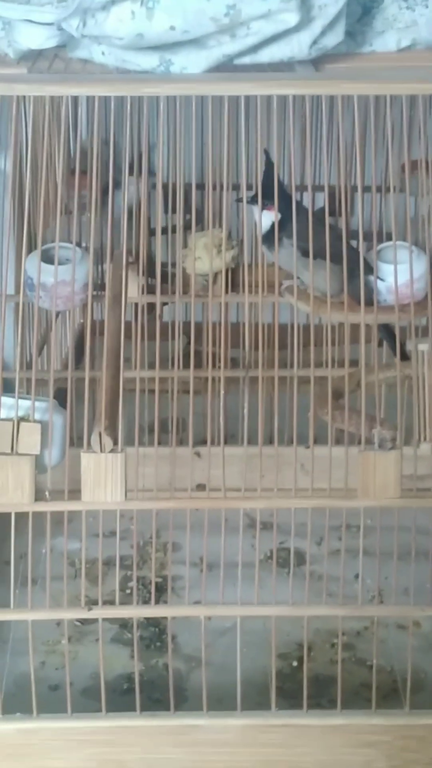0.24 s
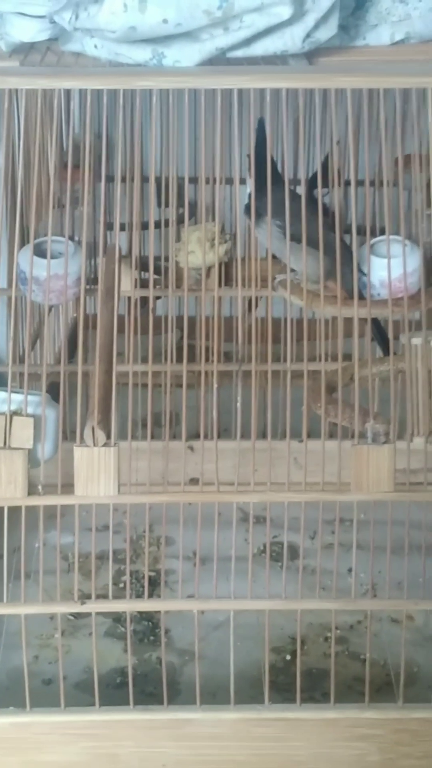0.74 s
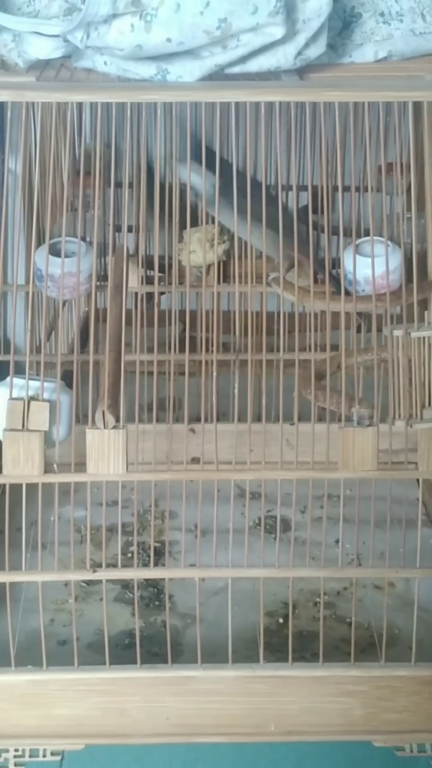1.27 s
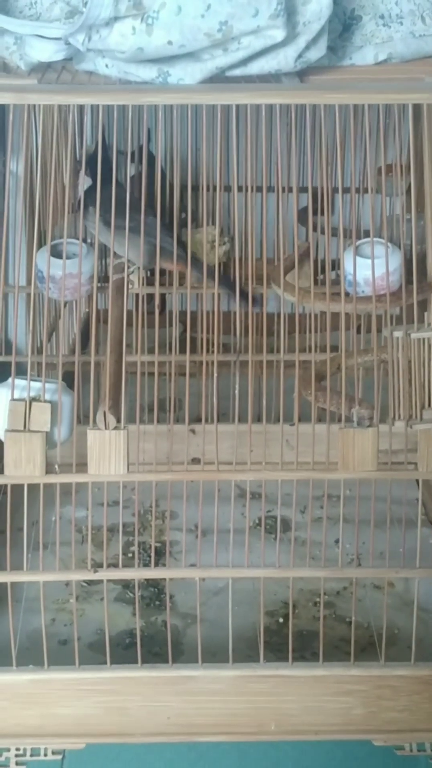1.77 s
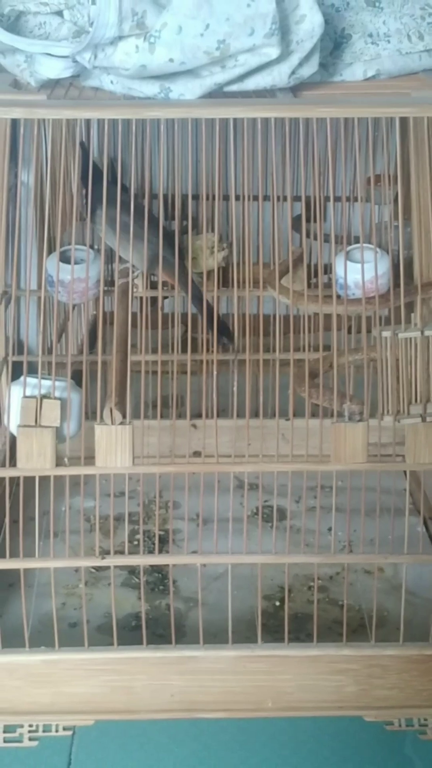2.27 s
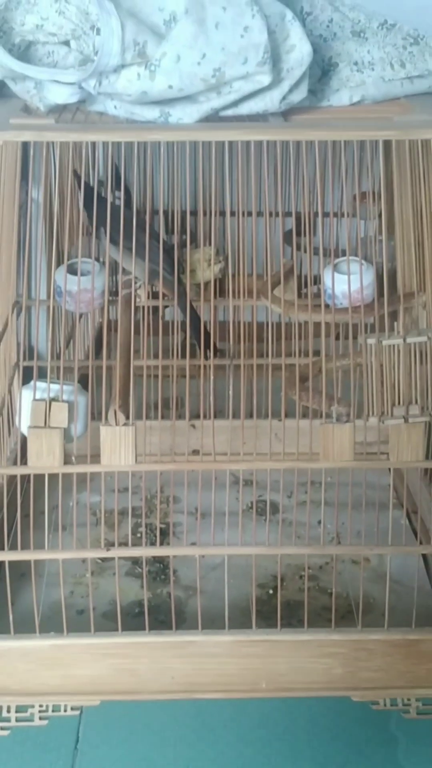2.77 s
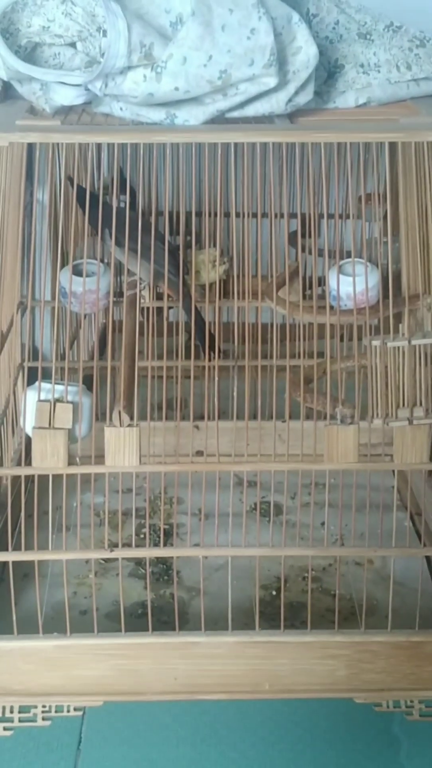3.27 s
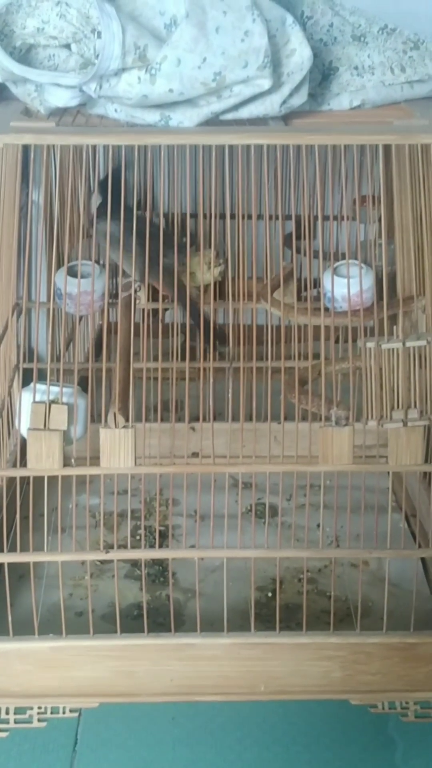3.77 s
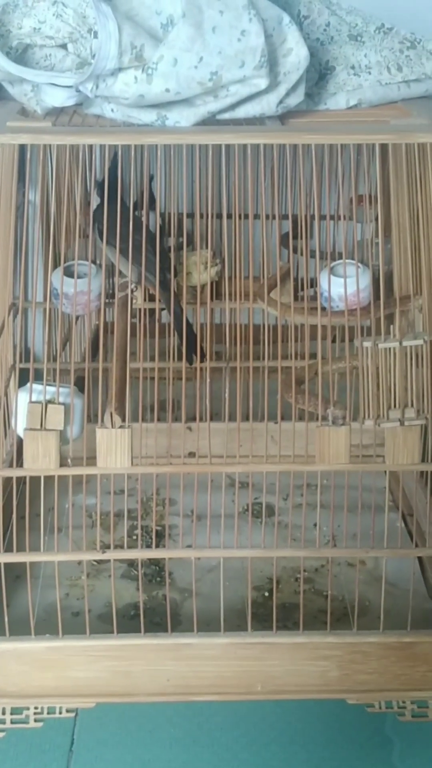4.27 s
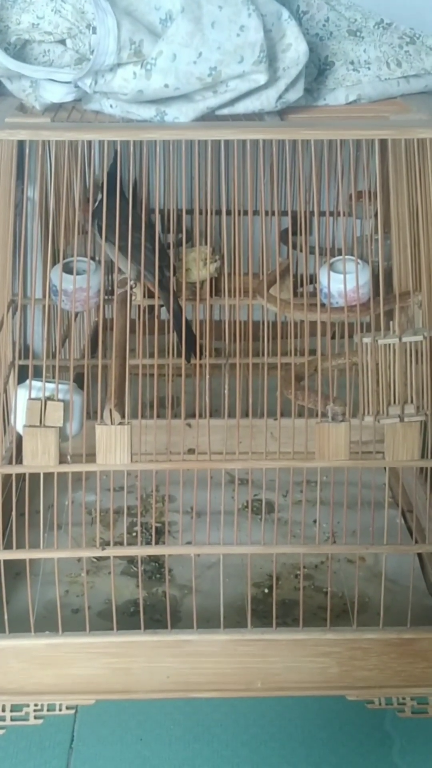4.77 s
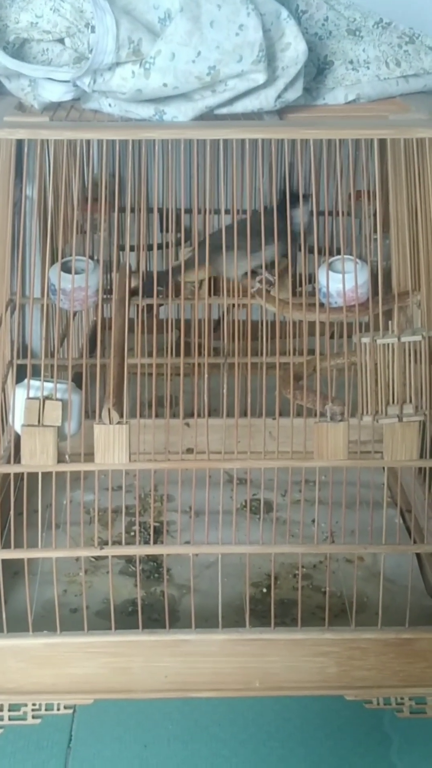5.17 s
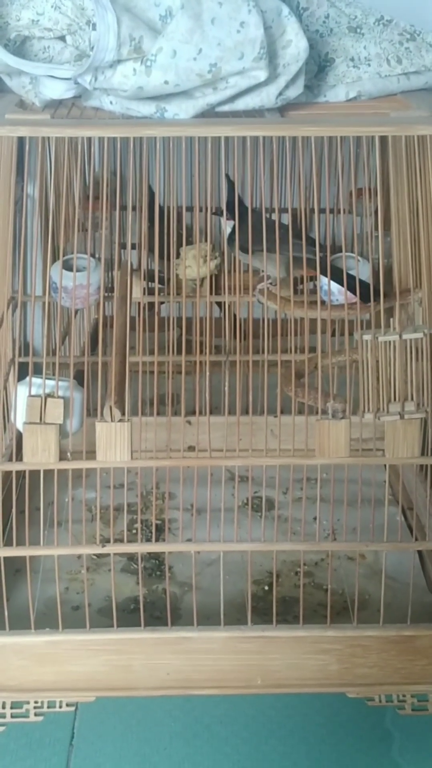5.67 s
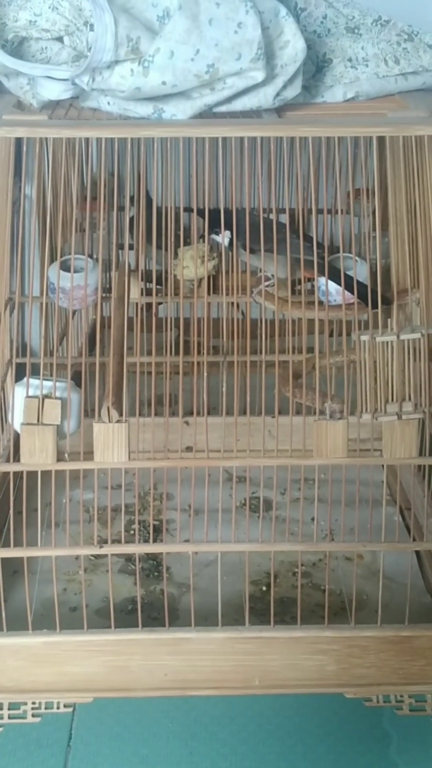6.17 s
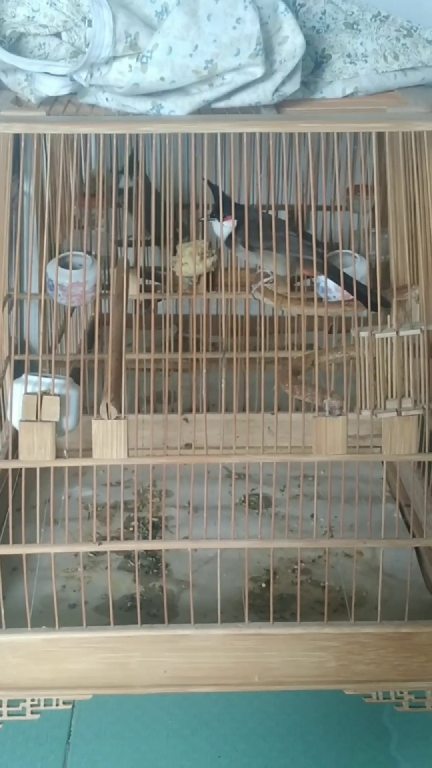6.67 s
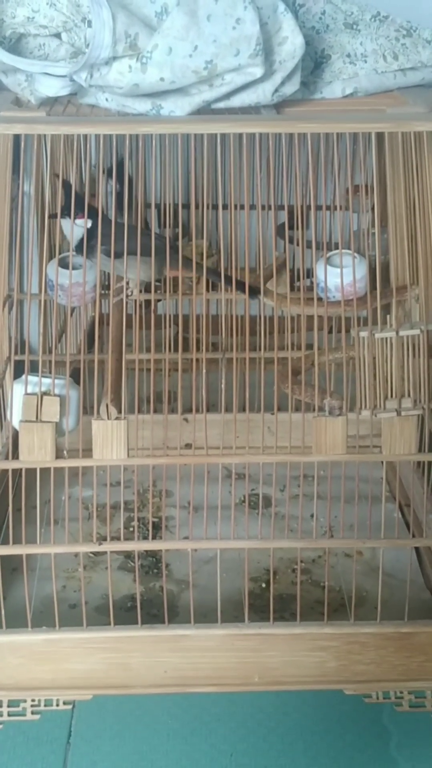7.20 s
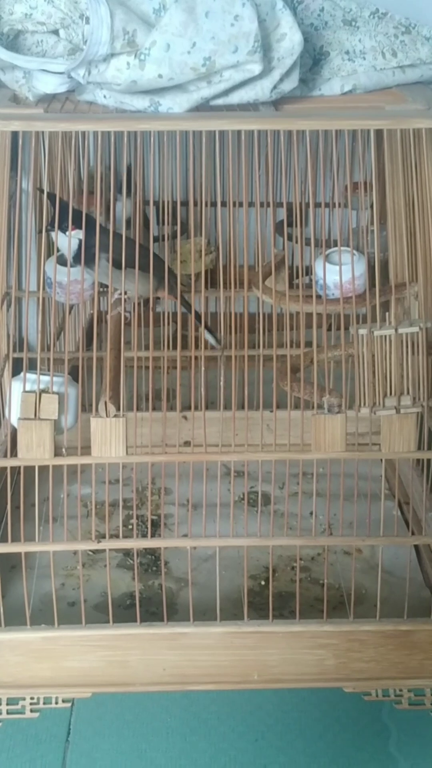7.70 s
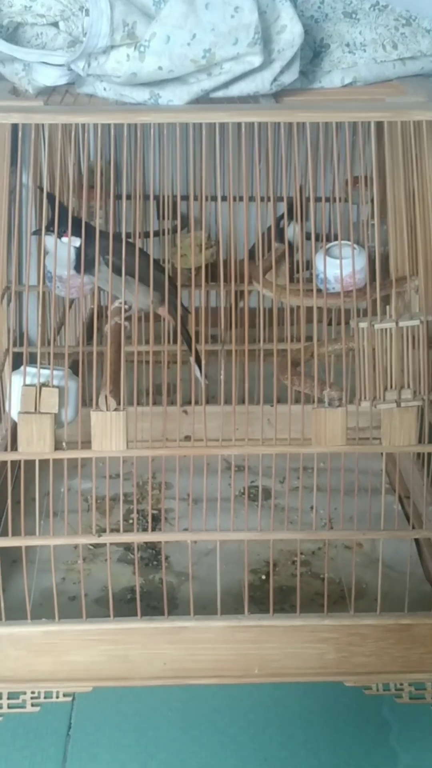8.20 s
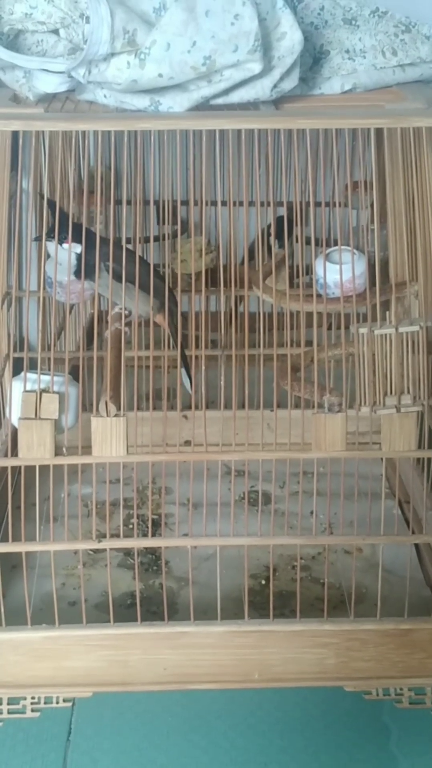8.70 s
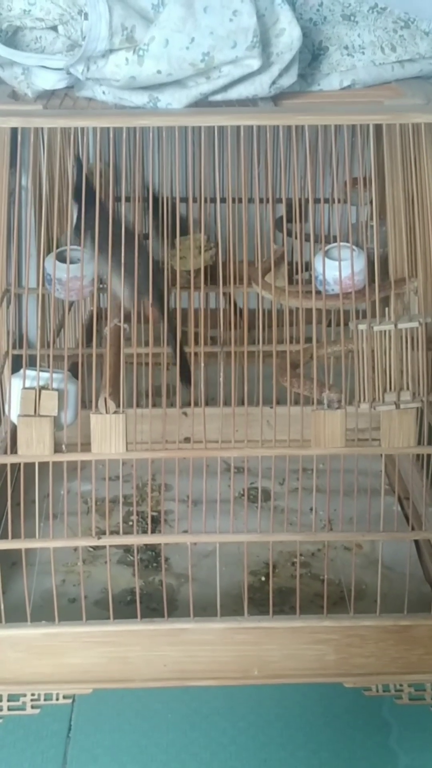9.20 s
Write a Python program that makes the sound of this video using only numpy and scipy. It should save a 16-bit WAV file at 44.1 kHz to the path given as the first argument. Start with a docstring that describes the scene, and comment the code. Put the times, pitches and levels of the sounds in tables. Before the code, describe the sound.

Bright, warbling bulbul calls burst out three times in a reverberant room, amid softer chirps, low chucks, perch scuffs and faint hiss.

```python
"""Caged bulbuls sing in a bare, echoing room, from a repertoire of seven whistled, warbling syllables.
Each note is a tone whose pitch and strength a fast warble shakes, with overtones and a breathy rasp.
The main phrase is a rising whip answered by an arch; other syllables are strung into chatter around it.
Room noise, a faint rumble and a wavering hiss, lies underneath.
Feet and feathers tick and scuff on the perches and bamboo bars: short grainy noise, some with a knock."""
import sys
import numpy as np
from scipy import signal
from scipy.fft import rfft, irfft, next_fast_len
from scipy.io import wavfile
from scipy.ndimage import map_coordinates

SR = 44100
rng = np.random.default_rng(int(sys.argv[2]) if len(sys.argv) > 2 else 0)


def waveform_to_disk(signal):
    """Save audio, clipped to [-1, 1], as 16-bit WAV at the path in sys.argv[1]."""
    frames = np.transpose(np.atleast_2d(signal))
    scaled = np.clip(frames, -1, 1) * 32767
    samples = np.round(scaled).astype(np.int16)
    wavfile.write(sys.argv[1], SR, samples)


N = 416744

# Syllable shapes at evenly spaced moments: pitch_ratio and warble_ratio (times the note's own), level_db
# whips up and levels off
WHIP_SHAPE = [(.7, 1.21, -6.5), (.91, 0.9, -2.5), (1, 0.79, 0), (1.02, 0.49, 2)]
# climbs, buzzes at the top, falls: pitch_ratio, warble_ratio, level_db
ARCH_SHAPE = [(0.63, 1.33, -4.5), (0.788, 0.83, -1.5), (0.87, 0.71, 0), (0.974, 0.95, -2.5),
              (1.028, 0.5, -0.5), (1.13, 1.46, -6), (1.008, 0.76, -2.0), (0.942, 0.48, 2.5),
              (0.84, 1.06, 7)]
# nearly level and deeply warbled: pitch_ratio, warble_ratio, level_db
BUZZ_SHAPE = [(1.03, 1.4, 2.5), (0.97, 0.85, -1.5), (1.006, 0.7, -0.5)]
# slides down: pitch_ratio, warble_ratio, level_db
SLUR_SHAPE = [(1.09, 0.87, 0), (1, 0.92, 0), (.92, 0.9, 0)]
# a clear, nearly level tone: pitch_ratio, warble_ratio, level_db
PIPE_SHAPE = [(1, .9, -1), (.995, 0.65, 0), (1.012, .8, 2)]
# a low, throaty hook: pitch_ratio, warble_ratio, level_db
CHUCK_SHAPE = [(.9, 1, -1), (1.02, .9, 0), (.97, 1, 0)]
# leaps up about an octave and holds the note: pitch_ratio, warble_ratio, level_db
SWOOP_SHAPE = [(0.45, 0.96, -8.5), (0.79, 1.0, -10), (1.024, 0.7, -4.5), (1.0, 0.71, 3),
               (0.997, 0.95, -0.5)]

# The main phrase, a whip answered by an arch: start_s, whip_hz, whip_db, arch_hz, arch_db
PHRASES = [(0.543, 3714, -30.5, 2950, -32), (2.435, 3456, -14.5, 2930, -11.5),
           (7.313, 3655, -15.5, 3060, -12.0)]
WHIP_S, ARCH_AFTER_S, ARCH_S = 0.096, 0.158, 0.168  # the arch is timed from the start of the whip
PHRASE_WARBLE = 0.1  # share of the pitch, before the shape scales it

# Chatter, by syllable: start_s, length_s, pitch_hz, level_db, warble_share (of the pitch, before the shape)
# rising whips
WHIP_NOTES = [(1.169, 0.088, 3434, -29.5, 0.16), (1.542, 0.068, 3438, -26.0, 0.045),
              (3.139, 0.08, 3393, -33.5, 0.15), (3.279, 0.15, 3625, -32, 0.116),
              (4.617, 0.088, 3620, -38.5, 0.083), (4.726, 0.18, 3620, -34.5, 0.098),
              (6.287, 0.114, 2470, -29.5, 0.13), (8.126, 0.047, 3387, -22.5, 0.14),
              (9.278, 0.097, 3350, -19.5, 0.11)]
# octave leaps: start_s, length_s, pitch_hz, level_db, warble_share
SWOOP_NOTES = [(1.395, 0.093, 2470, -26, 0.055), (5.175, 0.053, 2998, -16, 0.022)]
# deeply warbled notes: start_s, length_s, pitch_hz, level_db, warble_share
BUZZ_NOTES = [(-0.044, 0.045, 3005, -22.5, 0.17), (2.295, 0.049, 2657, -36, 0.15),
              (3.34, 0.072, 4000, -39.5, 0.1), (3.454, 0.17, 3033, -33.5, 0.12),
              (3.632, 0.14, 3360, -42, 0.11), (3.943, 0.051, 3285, -30.0, 0.12),
              (4.987, 0.14, 2450, -39.5, 0.16), (5.062, 0.06, 3886, -13.5, 0.12),
              (5.216, 0.079, 3638, -12, 0.074), (5.957, 0.062, 2348, -33.5, 0.1),
              (6.02, 0.139, 2424, -35.5, 0.15), (6.414, 0.078, 2594, -28.0, 0.126),
              (6.867, 0.054, 2156, -37, 0.096), (7.739, 0.044, 3820, -31.5, 0.053),
              (7.872, 0.12, 3375, -25, 0.12), (8.092, 0.0062, 3585, -20.5, 0.13),
              (8.175, 0.17, 3237, -29.5, 0.066), (8.536, 0.036, 3340, -25, 0.13)]
# falling slides: start_s, length_s, pitch_hz, level_db, warble_share
SLUR_NOTES = [(0.53, 0.043, 1777, -43, 0.19), (1.644, 0.099, 2684, -28.0, 0.087),
              (1.742, 0.13, 1861, -37.5, 0.081), (2.104, 0.128, 1640, -41, 0.067),
              (3.728, 0.097, 2043, -41.5, 0.095), (3.83, 0.11, 2570, -31, 0.078),
              (4.438, 0.172, 1910, -48, 0.14), (4.645, 0.083, 2497, -40.0, 0.062),
              (5.055, 0.014, 3585, -19.5, 0.1), (6.806, 0.103, 2603, -39, 0.083),
              (7.772, 0.176, 2340, -28, 0.11), (8.093, 0.023, 2152, -20.5, 0.048),
              (8.168, 0.032, 2504, -24.5, 0.13), (8.424, 0.11, 2540, -30.5, 0.068),
              (8.839, 0.087, 1660, -36.5, 0.12)]
# clear tones: start_s, length_s, pitch_hz, level_db, warble_share
PIPE_NOTES = [(.005, 0.054, 2870, -24.5, 0.011), (2.404, 0.075, 1996, -25.5, .05),
              (3.8, 0.049, 1640, -38.5, .025), (3.976, .035, 2835, -28.5, .015),
              (5.052, 0.06, 3167, -20.5, .02), (6.115, .033, 1940, -33.5, .03),
              (6.472, 0.0386, 1948, -29.5, 0.032), (8.553, 0.089, 2930, -25.5, 0.022),
              (9.09, 0.07, 2077, -24, .01), (9.325, .06, 3440, -27.5, 0.021)]
# throaty hooks, sharing one warble: start_s, length_s, pitch_hz, level_db
CHUCK_NOTES = [(1.415, 0.028, 1443, -44), (1.531, 0.062, 1956, -37.5), (2.3, 0.024, 1430, -33),
               (3.71, 0.042, 1520, -36.5), (3.865, 0.026, 1380, -40), (6.182, 0.097, 1494, -50),
               (6.298, 0.055, 1600, -43.5), (6.42, .061, 1498, -44), (6.658, .038, 1532, -42.5),
               (6.963, .057, 1542, -40), (7.012, 0.043, 1700, -39.5), (7.142, 0.037, 1600, -42),
               (7.636, 0.022, 1530, -36.5), (7.704, .045, 1990, -31.5), (7.896, 0.051, 1726, -31)]
CHUCK_WARBLE = 0.075  # share of the pitch, before the shape scales it
CHUCK_OCTAVE_DB = -10  # a chuck's second harmonic, against its first

# Overtones of a loud note, before they are coloured: pitch_multiple, level_db
OVERTONES = [(2, -32), (3, -35), (4, -42)]
# The colour on overtones and rasp, dipping near 5.5 kHz and peaking near 9.6 kHz: frequency_hz, gain_db
EDGE_COLOUR = [(1000, -5.5), (4500, 1.5), (5500, -8), (7000, -4), (8200, -3), (9600, 6), (11000, -2), (12500, -7),
               (15000, -19)]
# The room's decay: frequency_hz, t60_s
ROOM_DECAY = [(300, 0.49), (1500, 0.89), (3000, 0.75), (4500, 0.79), (9000, 0.58), (15000, 0.2)]

# Spectrum of the room's rumble: frequency_hz, relative level_db (per Hz)
RUMBLE = [(15, -18), (25, 3.5), (55, 0), (90, -6.5), (140, -3.5), (250, -15.5), (500, -46)]
# Spectrum of the room's hiss: frequency_hz, relative level_db (per Hz)
HISS = [(100, -21), (250, -1.5), (500, 1), (1000, -4.5), (2500, -1.5), (4500, -6.5), (6500, -15.5),
        (9200, -11), (12000, -33), (15000, -42.5)]
RUMBLE_DB, HISS_DB = -54.5, -55
# How alike the room noise is at left and right: frequency_hz, likeness (0 to 1)
ALIKE = [(30, 0.38), (120, 0.91), (300, 0.72), (600, 0.56), (1500, 0.035), (10000, 0.076)]

# Feet and feathers on the cage: start_s, scuff_db, knock_db (on the perch), length_s, bar_hz (the rubbed bar)
SCUFFS = [(2.071, -49, -49.5, 0.02, 1790), (2.295, -49, -69, 0.038, 3020), (2.885, -36.5, -46, 0.025, 2610),
          (3.45, -44.5, -60, 0.023, 4180), (3.744, -42.5, -67, 0.038, 3930), (4.29, -47, -52, 0.022, 4660),
          (5.825, -54.5, -56, 0.044, 2010), (5.996, -51.5, -55.5, 0.029, 3420),
          (6.693, -39.5, -56.5, 0.044, 8670), (7.229, -56, -70, 0.07, 4560), (7.989, -35, -58, 0.038, 4980),
          (8.767, -45.5, -61.5, 0.067, 2200)]
# Spectrum of the scrape: frequency_hz, relative level_db (per Hz)
SCRAPE = [(700, -13.5), (1500, 3.5), (3000, 10.5), (5000, 0), (7000, -4), (9500, -3.5), (12000, -21.5),
          (15000, -31)]
# Spectrum of the perch knock: frequency_hz, relative level_db (per Hz)
PERCH = [(120, -24.5), (250, -7.5), (400, -5.5), (700, -8), (1400, -10), (3000, -36)]
SETTLE_DB, SETTLE_S = -18, 0.39  # rustle after each scuff: level under the stroke, decay time constant

TOP_HZ = 15200  # the microphone's band limit


def amp(db):
    """Decibels to gain."""
    return 10 ** (np.asarray(db) / 20)


def unit(x):
    """x at rms 1."""
    return x / np.sqrt(np.mean(x ** 2) + 1e-20)


def along(points, hz):
    """(Hz, value) points read on a log frequency axis."""
    f, v = np.transpose(points)
    return np.interp(np.log(hz + 1), np.log(f + 1), v)


def wobble(size, rate):
    """A smooth random curve, rate knots a second."""
    knots = rng.standard_normal(int(size * rate / SR) + 4)
    return map_coordinates(knots, [np.arange(size) * rate / SR])


def filtered(x, response):
    """x shaped by a response of frequency."""
    n = x.shape[-1]
    m = next_fast_len(n + 4096)
    spectrum = rfft(x, m) * response(np.fft.rfftfreq(m, 1 / SR))
    return irfft(spectrum, m)[..., :n]


def coloured(x, spectrum):
    """x given a (Hz, dB) spectrum, at rms 1."""
    return unit(filtered(x, lambda hz: amp(along(spectrum, hz))))


def add(out, s, x):
    """Mix x into out from time s; a sound may be under way at time zero."""
    start = round(s * SR)
    x, start = x[:, max(-start, 0):], max(start, 0)
    out[:, start:start + x.shape[1]] += x[:, :N - start]


def syllables():
    """Everything sung, as (shape, start_s, length_s, pitch_hz, level_db, warble_share)."""
    chatter = [(WHIP_SHAPE, WHIP_NOTES), (SWOOP_SHAPE, SWOOP_NOTES), (BUZZ_SHAPE, BUZZ_NOTES),
               (SLUR_SHAPE, SLUR_NOTES), (PIPE_SHAPE, PIPE_NOTES)]
    notes = [(shape, *row) for shape, rows in chatter for row in rows]
    notes += [(CHUCK_SHAPE, *row, CHUCK_WARBLE) for row in CHUCK_NOTES]
    for s, whip_hz, whip_db, arch_hz, arch_db in PHRASES:
        notes.append((WHIP_SHAPE, s, WHIP_S, whip_hz, whip_db, PHRASE_WARBLE))
        notes.append((ARCH_SHAPE, s + ARCH_AFTER_S, ARCH_S, arch_hz, arch_db, PHRASE_WARBLE))
    return notes


def whistle(shape, length_s, pitch_hz, warble_share, bright, warble_hz=110, scallop=0.14, flutter=0.13,
            throb=0.036, late=1.34, rasp_db=-37):
    """One note: a tone follows its syllable's shape while a fast warble shakes its pitch and strength."""
    n = max(round(length_s * SR), 64)
    u = np.arange(n) / n  # progress through the note
    moments = np.linspace(0, 1, len(shape))
    glide, depth, level_db = (np.interp(u, moments, column) for column in np.transpose(shape))

    depth_hz = pitch_hz * warble_share * depth
    uneven_hz = warble_hz * (1 + 0.146 * wobble(n, 59.15))
    cycle = 2 * np.pi * (rng.random() + np.cumsum(uneven_hz) / SR)
    warble = np.sin(cycle) + scallop * np.cos(2 * cycle)  # the pitch dwells at the top and dips quickly
    moving_hz = pitch_hz * glide + depth_hz * (warble + flutter * wobble(n, 397))
    phase = 2 * np.pi * np.cumsum(moving_hz) / SR

    tone = np.sin(phase)
    overtones = sum(amp(db) * np.sin(k * phase) for k, db in OVERTONES)
    rasp = amp(rasp_db) * rng.standard_normal(n)  # air turbulence in the syrinx
    edge = bright * filtered(overtones + rasp, lambda hz: amp(along(EDGE_COLOUR, hz)))
    # a chuck is low enough for the throat to pass its octave
    octave = amp(CHUCK_OCTAVE_DB) * np.sin(2 * phase) if shape is CHUCK_SHAPE else 0

    pressure = np.abs(np.sin(np.pi * u ** late)) ** 0.5  # peaks past the middle of the note
    swell = pressure * signal.windows.tukey(n, 0.2)
    buzz = 1 + throb * np.tanh(depth_hz / 150) * warble  # the shallower the warble, the less it throbs
    return swell * amp(level_db) * unit((tone + octave + edge) * buzz)


def room_tails(count=12, build_s=0.0038, early_db=3, early_s=0.016):
    """Random stereo echoes of one room: decaying noise, strengthened at its start."""
    noise = rng.standard_normal((count, 2, SR))
    hz, t, bins = signal.stft(noise, SR, nperseg=256)
    decay = amp(-60 * t / along(ROOM_DECAY, hz)[:, None])
    tails = signal.istft(bins * decay, SR, nperseg=256)[1]
    t = np.arange(tails.shape[-1]) / SR
    build = 1 - np.exp(-t / build_s)
    early = amp(early_db * np.exp(-t / early_s))
    return tails * build * early


def in_room(x, tails, direct_db):
    """A random echo at the sound's own energy, plus direct sound reaching the two ports slightly apart."""
    wet = signal.fftconvolve(x[None], tails[rng.integers(len(tails))], axes=1)
    wet *= np.linalg.norm(x) / np.linalg.norm(wet, axis=1, keepdims=True)
    for port, lag in enumerate(rng.integers(0, 24, size=2)):  # lag in samples
        wet[port, lag:lag + len(x)] += amp(direct_db) * x
    return wet


def song(tails, loud_db=-14, brightening=0.25):
    """Harder notes are richer in overtones; each takes one of a few random room echoes."""
    out = np.zeros((2, N))
    for shape, s, length_s, pitch_hz, level_db, warble_share in syllables():
        bright = amp(brightening * (level_db - loud_db))
        note = whistle(shape, length_s, pitch_hz, warble_share, bright)
        add(out, s, amp(level_db) * in_room(note, tails, direct_db=-4.5))
    return out


def stereo_noise(spectrum):
    """Noise of rms 1; its ports are most alike near 120 Hz, less in the deepest bass, hardly in the treble."""
    def turn(hz):
        return np.arccos(np.clip(along(ALIKE, hz), -1, 1)) / 2

    def mid_side(hz):
        return amp(along(spectrum, hz)) * [np.cos(turn(hz)), np.sin(turn(hz))]

    mid, side = filtered(rng.standard_normal((2, N)), mid_side)
    return unit(np.array([mid + side, mid - side]))


def room_noise(drift_db=2):
    """A steady rumble of low noise under a hiss whose level wavers a little."""
    rumble = amp(RUMBLE_DB) * stereo_noise(RUMBLE)
    hiss_level = amp(HISS_DB + drift_db * wobble(N, 13))
    return rumble + hiss_level * stereo_noise(HISS)


def scuff(scuff_db, knock_db, length_s, bar_hz, grain_db=3, bar_db=10, bar_width_hz=500):
    """Claws and feathers make a short grainy scrape that rings a bar; a landing also knocks the perch."""
    t = np.arange(SR // 2) / SR
    stroke = t / length_s * np.exp(1 - 2 * t / length_s) * 2  # peaks at half its length
    # feathers go on rustling
    stroke += amp(SETTLE_DB) * np.exp(-t / SETTLE_S) * signal.windows.tukey(len(t), 0.2)
    grains = rng.standard_normal(len(t)) * amp(grain_db * wobble(len(t), 900))
    # the bar's resonance
    grains = filtered(grains, lambda hz: amp(bar_db / (1 + ((hz - bar_hz) / bar_width_hz) ** 2)))
    scrape = amp(scuff_db) * coloured(grains, SCRAPE)
    knock = amp(knock_db) * coloured(rng.standard_normal(len(t)), PERCH)
    return stroke * (scrape + knock)


def cage(tails, count=36, fidget_db=-62, tap_db=-66, tick_s=0.01, bar_hz=3500):
    """The listed hops, and faint ticks at random times from birds fidgeting on their perches."""
    out = np.zeros((2, N))
    starts = rng.uniform(0, N / SR, count)
    spreads = rng.standard_normal((count, 2))
    fidgets = [(s, fidget_db, tap_db, tick_s * np.exp(0.5 * a), bar_hz * np.exp(0.5 * b))
               for s, (a, b) in zip(starts, spreads)]
    for s, *contact in SCUFFS + fidgets:
        add(out, s, in_room(scuff(*contact), tails, direct_db=0.5))
    return out


def scene(lean_db=0.78):
    """Birds, room and cage, a little stronger on the right."""
    tails = room_tails()
    mix = song(tails) + room_noise() + cage(tails)
    return mix * amp([[-lean_db], [lean_db]])


def record(dry):
    """The microphone keeps nothing above its band limit."""
    return filtered(dry, lambda hz: hz < TOP_HZ)


dry = scene()
out = record(dry)
waveform_to_disk(out)
```